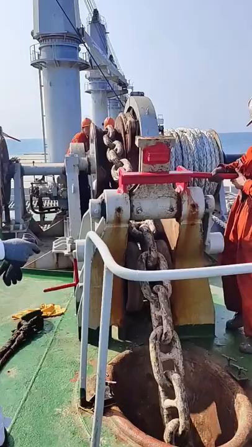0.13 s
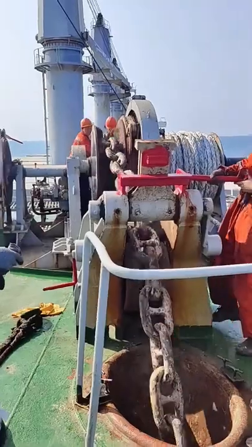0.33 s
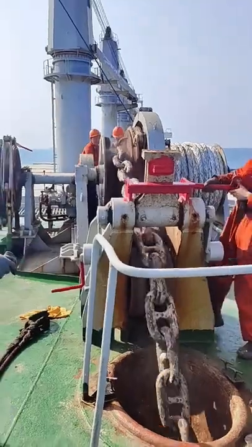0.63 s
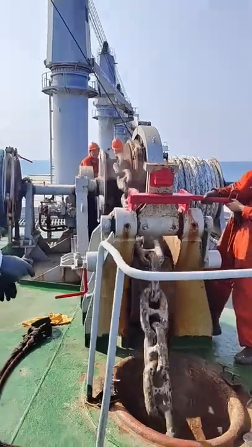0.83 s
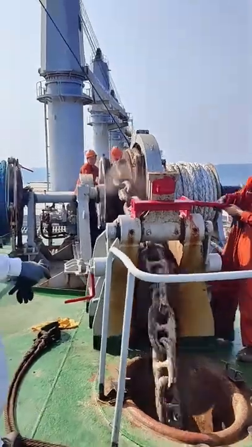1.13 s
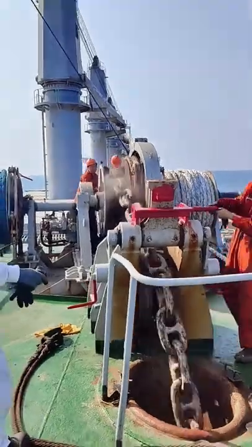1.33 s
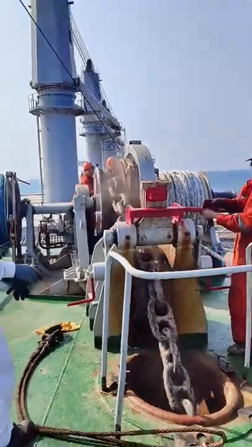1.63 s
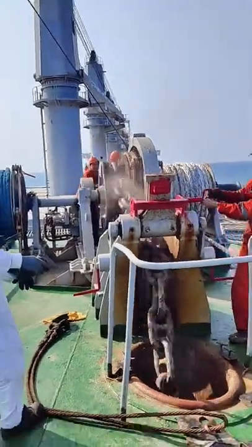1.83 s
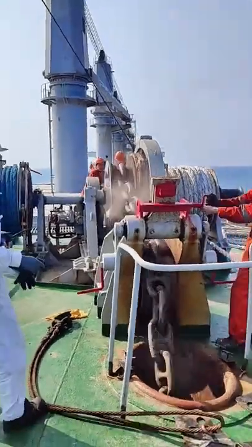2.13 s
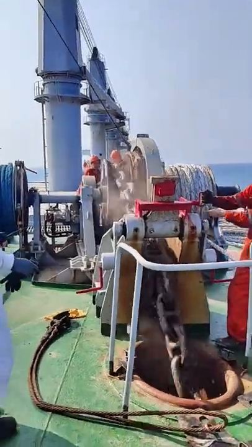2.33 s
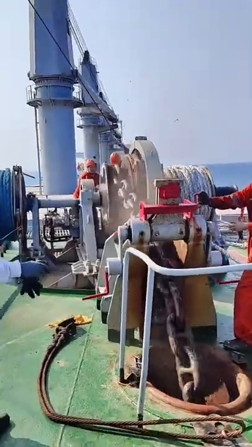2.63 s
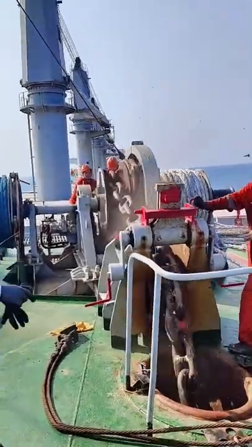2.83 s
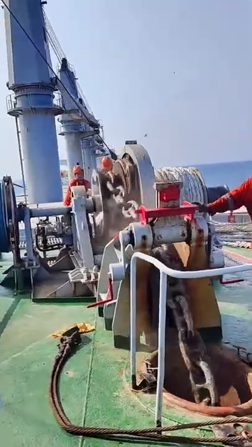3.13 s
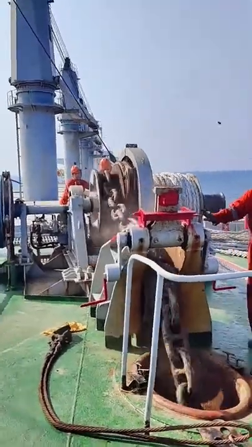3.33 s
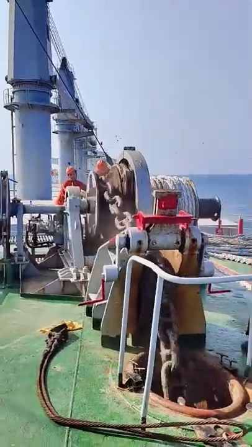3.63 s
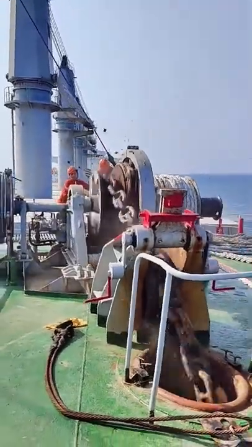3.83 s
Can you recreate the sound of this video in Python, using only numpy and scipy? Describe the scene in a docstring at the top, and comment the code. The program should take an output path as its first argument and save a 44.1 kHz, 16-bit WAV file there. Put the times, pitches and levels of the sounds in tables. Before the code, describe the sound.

A heavy steel anchor chain runs out over a ship's windlass, slamming and clattering loudly

```python
"""A heavy anchor chain is let go and runs out over a ship's windlass: steel links slam over the wheel
about nine times a second, each blow a chattering volley of ringing modes, and links jostle in between.
The hawse pipe clatters and the deck rumbles, made of many dull knocks given a colour by a filter.
The slack chain lurches into the pipe, then snatches tight and the deck booms.
A short echo of fading noise comes back from the steelwork all round."""
import sys
import numpy as np
from scipy import signal
from scipy.fft import rfft, irfft, next_fast_len
from scipy.io import wavfile

SR = 44100
rng = np.random.default_rng(int(sys.argv[2]) if len(sys.argv) > 2 else 0)


def generate_wav(sig):
    """Save sig (samples, or channels by samples) to the path in sys.argv[1] as 16-bit PCM at SR."""
    pcm = np.round(np.clip(np.atleast_2d(sig).T, -1, 1) * 32767).astype(np.int16)
    wavfile.write(sys.argv[1], SR, pcm)


N = 176400  # samples, 4 s

# filter curve of a steel link: pitch_hz, gain_db
LINK_COLOUR = [(400, -18), (1000, 0), (1400, 3.5), (1620, -4.5), (1780, -2), (2200, 0.5), (2750, -2.5),
               (3000, -7), (3300, -10.5), (3700, -12), (4700, -14), (5200, -13), (6200, -24.5), (7500, -20),
               (8800, -51), (11000, -36), (13000, -33), (15500, -80)]
# filter curve of scraped and crushed rust: pitch_hz, gain_db
RUST_COLOUR = [(500, -2), (2000, 3.5), (5000, 11.5), (7500, 5), (9000, -2.5), (11000, 4), (13000, 3.5),
               (14300, 7), (15500, -17)]
# links slamming over the wheel, levels before the trims below:
# start_s, clang_db, ring_db, sizzle_db, length_s (how fast the volley fades)
WHEEL_SLAMS = [(.57, -10, -27.5, -37, 0.03), (0.708, -3.5, -38, -27, 0.0067),
               (0.776, -13.5, -30.5, -35.5, 0.058), (.825, -9, -34, -53, 0.052),
               (.963, -11, -53, -35, 0.047), (1.054, -11.5, -24.5, -49, 0.042),
               (1.10, -10, -43, -38, 0.073), (1.16, -7, -25, -48, 0.016), (1.226, -7.5, -48, -35, 0.014),
               (1.396, -8, -33, -37, 0.032), (1.526, -7, -29.5, -42, 0.046), (1.571, -11, -34, -39, 0.031),
               (1.74, -3.5, -27.5, -30.5, 0.029), (1.886, -7.5, -30.5, -37, 0.038),
               (1.954, -7.5, -26.5, -48, 0.069), (2.149, -3, -22, -39, 0.035),
               (2.288, -4.5, -23.5, -48, 0.03), (2.415, -18, -26.5, -52, 0.022),
               (2.67, -8.5, -28, -43, 0.042), (2.814, -6, -31, -32.5, 0.024),
               (2.913, -10, -25.5, -49, 0.067), (3.02, -10.5, -29, -48, 0.054),
               (3.079, -15, -29.5, -41, 0.065), (3.166, -6.5, -31, -33, 0.034),
               (3.339, -11.5, -30.5, -52, 0.13), (3.402, -4.5, -26, -36, 0.03),
               (3.51, -10.5, -24, -37.5, 0.054), (3.645, -17, -30, -44, 0.096),
               (3.754, -7, -21.5, -56, 0.015), (3.866, -2, -27.5, -47, 0.015),
               (3.972, -4.5, -24, -49, 0.036)]
CLANG_TRIM_DB, RING_TRIM_DB, SIZZLE_TRIM_DB = -8, 2.5, 1.5
STRIKE = 1.7  # strength of a slam's first blow; a typical chatter contact is about 1


def slams(modes):
    """Each link hits the wheel and chatters on its neighbour: a clang, a higher ring, a sizzle of rust."""
    out = np.zeros((2, N + SR))
    for start_s, clang_db, ring_db, sizzle_db, length_s in WHEEL_SLAMS:
        struck = volley(modes, length_s, STRIKE)
        neighbour = volley(modes, length_s, 0)
        steel = coloured(struck + neighbour, LINK_COLOUR)
        rust = coloured(neighbour, RUST_COLOUR)
        # the clang lies below 2800 Hz and is weakened below 1660 Hz
        clang = filtered(steel, lambda hz: below(hz, 2800) * (1 - 0.63 * below(hz, 1660)))
        ring = filtered(steel, lambda hz: 1 - below(hz, 3070))
        sizzle = filtered(rust, lambda hz: 1 - below(hz, 6200))
        parts = [(clang_db + CLANG_TRIM_DB, clang),
                 (ring_db + RING_TRIM_DB, ring),
                 (sizzle_db + SIZZLE_TRIM_DB, sizzle)]
        size = steel.shape[1]
        spread = np.sqrt(abs(length_s) * SR / size)  # sets the energy by the volley's length
        place = out[:, int(start_s * SR):][:, :size]
        for db, part in parts:
            place += amp(db) * unit(part) * spread
    return out[:, :N]


CHATTER_PER_S, CHATTER_RISE_S = 480, .006


def volley(modes, length_s, strike):
    """A first blow, then chatter that builds up and dies away, ringing one link."""
    t = np.arange(SR // 5) / SR
    swell = np.exp(-(t / length_s) ** 2) * (1 - np.exp(-t / CHATTER_RISE_S))
    hits = contacts(len(t), CHATTER_PER_S, scatter_db=1.5) * swell
    hits = hits + strike * (t == 0)
    return signal.fftconvolve(hits[None], link(modes), axes=1)


# a few modes at set pitches, added to the random ones,
# before each link's own variation: pitch_hz, gain_db
SET_MODES = [(1768, -4), (2198, -4), (3236, 2)]


def link_modes(count=48):
    """The modes that all links share: close in the clang, sparse and uneven above, crowded at the top."""
    low_hz = np.linspace(750, 2950, count) + 18 * rng.standard_normal(count)
    high_count = count - 20
    high_hz = np.geomspace(3100, 8500, high_count) * np.exp(.008 * rng.standard_normal(high_count))
    top_hz = rng.uniform(8500, 15500, count)
    set_hz, set_db = np.transpose(SET_MODES)
    low_db = rng.uniform(-4, 0, count)
    high_db = rng.uniform(-3, 1, high_count)
    top_db = rng.uniform(-6, -2, count)
    return np.r_[low_hz, high_hz, top_hz, set_hz], amp(np.r_[low_db, high_db, top_db, set_db])


# seconds to fade by 60 dB: modes up to 7000 Hz, modes above, and the crack
LINK_T60, TREBLE_T60, CRACK_T60 = 0.135, .09, .015
CRACK_DB = -19
LINK_SPREAD = .016  # random detuning of each mode, as a fraction of its pitch


def link(modes, size=8192):
    """One link struck: a crack, then its modes, weighted anew every time; the high ones die first."""
    hz, gain = modes
    hz = hz * (1 + LINK_SPREAD * rng.standard_normal(len(hz)))
    weight = gain * hz ** .2 * amp(2.5 * rng.standard_normal(len(hz)))
    bins = np.clip(np.round(hz * size / SR).astype(int), 0, size // 2)
    spectrum = np.zeros((2, size // 2 + 1), complex)
    spectrum[:, bins] = weight * np.exp(2j * np.pi * rng.random((2, len(hz))))  # random phases
    high = np.fft.rfftfreq(size, 1 / SR) > 7000
    fall = -60 * np.arange(size) / SR
    body = irfft(spectrum * ~high) * amp(fall / LINK_T60)
    treble = irfft(spectrum * high) * amp(fall / TREBLE_T60)
    return unit(body + treble) + amp(CRACK_DB) * burst(CRACK_T60, size=size)


# links jostling between slams, levels before the trims in the function:
# time_s, knocks_db, scrape_db (rusty scraping)
JOSTLE_LEVELS = [(.39, -47, -38), (.5, -26, -35.5), (.53, -15, -44), (.65, -24.5, -32), (.8, -16, -30.5),
                 (1.15, -15.5, -36.5), (1.32, -16.5, -41.5), (1.66, -18.5, -43.5), (2.0, -16.5, -40),
                 (2.25, -18.5, -42.5), (2.55, -18, -42.5), (2.78, -19.5, -40.5), (2.95, -17.5, -39),
                 (3.25, -17.5, -39.5), (3.48, -20.5, -42), (4, -14.5, -42)]
JOSTLE_PER_S, SCRAPE_PER_S = 110, 450


def jostling(modes):
    """Links knock together at random moments; denser contacts make a bright scraping edge."""
    knock_level, scrape_level = levels(JOSTLE_LEVELS)
    knocks = rattle(lambda: link(modes), JOSTLE_PER_S, scatter_db=2.5, count=40)
    grind = rattle(lambda: link(modes), SCRAPE_PER_S, scatter_db=3, count=40)
    knocks = amp(-1.5) * knock_level * coloured(knocks, LINK_COLOUR)
    scrape = amp(4.5) * scrape_level * coloured(grind, RUST_COLOUR)
    return knocks + scrape


def chain():
    """Slams and jostling, ringing on one shared set of link modes."""
    modes = link_modes()
    return slams(modes) + jostling(modes)


# the slack chain lurches into the pipe, filter curve: pitch_hz, gain_db
LURCH_COLOUR = [(70, -32), (200, -7.5), (370, 0), (550, -8), (760, 1.5), (900, -9.5), (1300, -31),
                (3000, -35.5)]


def lurch():
    """The slack chain lurches into the pipe: a brief surge of knocks."""
    return roar(peak_s=0.48, length_s=0.059, db=-11, colour=LURCH_COLOUR)


# the deck's boom, filter curve: pitch_hz, gain_db
BOOM_COLOUR = [(60, -25), (130, 0), (210, -3), (1500, -80)]


def boom():
    """The chain snatches tight and the deck booms: a shorter, deeper surge of knocks."""
    return roar(peak_s=0.765, length_s=0.039, db=-16, colour=BOOM_COLOUR)


def roar(peak_s, length_s, db, colour):
    """A dark, heavy surge of dense knocks that swells and fades in a bell shape."""
    level, = levels([(0, db)])
    t = np.arange(N) / SR
    swell = level * np.exp(-.5 * ((t - peak_s) / length_s) ** 2)
    return swell * coloured(rattle(knock, 600, scatter_db=1, count=200), colour)


# deck and pipe while the chain runs, levels before the trims in the function:
# time_s, rumble_db (deck), clatter_db (pipe)
HULL_LEVELS = [(.4, -20, -26.5), (.47, -20.5, -20.5), (.62, -20.5, -14), (.69, -23.5, -15),
               (.79, -18.5, -17.5), (.88, -23.5, -16.5), (1.03, -23, -16.5), (1.25, -26.5, -18.5),
               (1.33, -23, -23), (1.41, -29, -14.5), (1.49, -26.5, -19.5), (1.58, -25.5, -16),
               (1.7, -24, -20.5), (2.12, -24, -17.5), (2.19, -31, -20.5), (2.5, -21, -18),
               (2.78, -21.5, -17), (2.95, -21.5, -15.5), (3.38, -23, -16.5), (3.5, -23, -17.5),
               (3.67, -20, -17), (3.82, -20, -19.5), (4, -23, -20)]
# filter curve of the deck: pitch_hz, gain_db
DECK_COLOUR = [(20, -38), (40, -18), (70, -9.5), (110, -1), (170, -2.5), (250, 1.5), (350, -10),
               (1500, -60)]
# filter curve of the hawse pipe: pitch_hz, gain_db
PIPE_COLOUR = [(120, -9), (250, -9), (350, 1), (550, 1), (750, 4.5), (840, 0), (1200, 1.5), (1480, -5),
               (1700, -2.5), (3000, -21.5), (8000, -60.5)]
CLATTER_PER_S, THUMPS_PER_S = 260, 220


def hull():
    """The chain beats on the hawse pipe and shakes the deck: random dull knocks, coloured for each."""
    rumble, clatter = levels(HULL_LEVELS)
    deck = coloured(rattle(knock, THUMPS_PER_S, scatter_db=2.5, count=150), DECK_COLOUR)
    pipe = coloured(rattle(knock, CLATTER_PER_S, scatter_db=3, count=90), PIPE_COLOUR)
    return amp(-2.0) * rumble * deck + amp(1.0) * clatter * pipe


def knock():
    """A dull blow on heavy plate: a short burst of fading noise."""
    return burst(0.066, size=2048)


# how long the echo lasts: pitch_hz, t60_s (time to fade by 60 dB)
ECHO_FADE = [(100, 0.4), (1000, 0.3), (4000, 0.29), (14000, 0.12)]


def steelwork(x):
    """A short echo from the windlass, deck and cranes: noise whose high pitches fade sooner."""
    hz, t, noise = signal.stft(rng.standard_normal((2, SR // 2)), SR, nperseg=256)
    fade = amp(-60 * t / along(ECHO_FADE, hz)[:, None])
    tail = signal.istft(noise * fade, SR, nperseg=256)[1]
    return signal.fftconvolve(x, tail / np.linalg.norm(tail[0]), axes=1)[:, :N]


# how alike left and right are: pitch_hz, likeness (0 to 1)
LIKENESS = [(30, .6), (100, .86), (300, .78), (600, .62), (1100, .25), (2200, .4), (5000, .25), (13000, .3)]
# left minus right, before the listener's turn: pitch_hz, difference_db
SIDE_BALANCE = [(60, 0), (150, -2.5), (350, 4.5), (700, -2), (2500, -1.7), (6000, -2), (13000, -5)]
# how far left leads right in phase: pitch_hz, lead_rad
LEFT_LEAD = [(0, 0), (80, 0), (200, .55), (450, 1.4), (1300, 1.7), (2300, .2), (4200, 0), (7000, 2.5)]


def ports(pair):
    """Two microphone ports: likeness, balance and the left's lead in phase all change with pitch."""
    def mixing(hz):
        angle = np.arccos(np.clip(along(LIKENESS, hz), -1, 1)) / 2
        return np.array([np.cos(angle), np.sin(angle)])

    def offset(hz):
        half = np.array([[.5], [-.5]])  # half the difference to each side
        return amp(half * along(SIDE_BALANCE, hz)) * np.exp(1j * half * along(LEFT_LEAD, hz))

    mid, side = filtered(pair, mixing)
    return filtered(np.array([mid + side, mid - side]), offset)


# the listener turns, left minus right on top of the ports' balance: time_s, difference_db
LISTENER_TURN = [(1.2, 0.5), (2.0, 4), (4, 3)]


def turned(x):
    """The listener turns, so the balance between left and right shifts gradually."""
    lean_db = np.interp(np.arange(N) / SR, *np.transpose(LISTENER_TURN))
    return x * amp([lean_db / 2, -lean_db / 2])


def amp(db):
    """Decibels to gain."""
    return 10 ** (np.asarray(db) / 20)


def unit(x):
    """Scale to an rms (average strength) of 1."""
    return x / np.sqrt(np.mean(x ** 2) + 1e-20)


def along(points, hz):
    """Read a curve of (pitch_hz, value) points, with pitch on a log axis."""
    f, v = np.transpose(points)
    return np.interp(np.log(hz + 1), np.log(f + 1), v)


START_S, RISE_S = 0.3738, 0.033  # the brake lets go, and the sound fades in


def levels(rows):
    """A gain per sample for each dB column, silent until the chain starts."""
    t = np.arange(N) / SR
    time_s, *columns = np.transpose(rows)
    started = np.clip((t - START_S) / RISE_S, 0, 1)
    return [amp(np.interp(t, time_s, column)) * started for column in columns]


def filtered(x, response):
    """Multiply the spectrum of x by a response that depends on pitch."""
    n = x.shape[-1]
    m = next_fast_len(n + 4096)
    return irfft(rfft(x, m) * response(np.fft.rfftfreq(m, 1 / SR)), m)[..., :n]


def below(hz, edge_hz):
    """A filter that passes what lies below the edge."""
    return 1 / (1 + (hz / edge_hz) ** 10)


def coloured(x, spectrum):
    """x through a filter curve, scaled to rms 1."""
    return unit(filtered(x, lambda hz: amp(along(spectrum, hz))))


def contacts(n, rate, scatter_db):
    """Pulses of random strength, each at a random moment within its turn."""
    turns = np.arange(int(n * rate / SR))
    at = ((turns + rng.random(len(turns))) * SR / rate).astype(int)
    strength = amp(scatter_db * np.clip(rng.standard_normal(len(at)), -2, 2))
    return np.bincount(at, strength, n)


def burst(t60, size=4096):
    """The dense, short ring of one contact: fading noise, separate for left and right."""
    return unit(rng.standard_normal((2, size)) * amp(-60 * np.arange(size) / SR / t60))


def rattle(ring, rate, scatter_db, count=24):
    """Random contacts on spots that pass by one after another, each with a ring of its own."""
    rings = [ring() for _ in range(count + 1)]
    hits = contacts(N, rate, scatter_db)
    size = rings[0].shape[1]
    out = np.zeros((2, N + size))
    for i in np.flatnonzero(hits):
        spot = int(count * i / N + rng.random())
        out[:, i:i + size] += hits[i] * rings[spot]
    return out[:, :N]


def scene():
    """Chain and hull among the steelwork, heard at two ports by a turning listener."""
    direct = chain() + lurch() + boom() + hull()
    echo = amp(-10) * steelwork(direct)
    return turned(ports(direct + echo))


TOP_HZ = 15700  # band limit


def record(dry):
    """The recorder rounds the highest peaks and keeps nothing above its band limit."""
    rounded = dry / (1 + np.abs(dry) ** 10) ** (1 / 10)
    return filtered(rounded, lambda hz: hz < TOP_HZ)


dry = scene()
out = record(dry)
generate_wav(out)
```